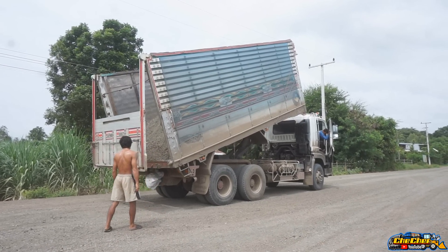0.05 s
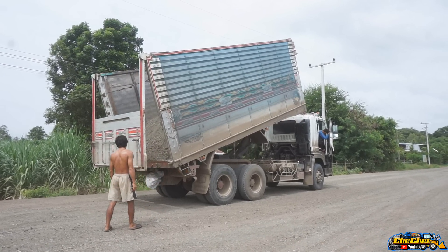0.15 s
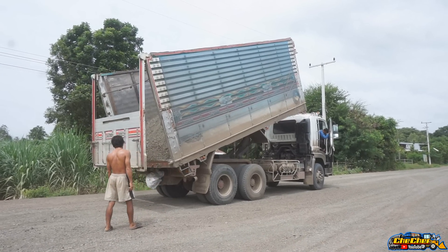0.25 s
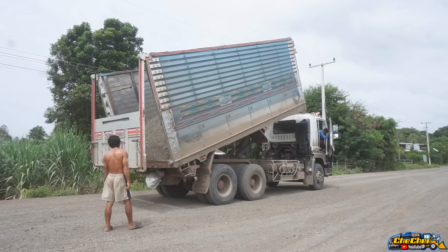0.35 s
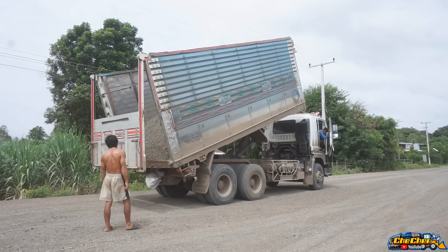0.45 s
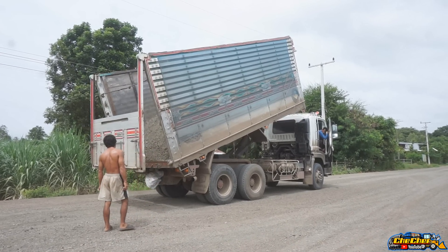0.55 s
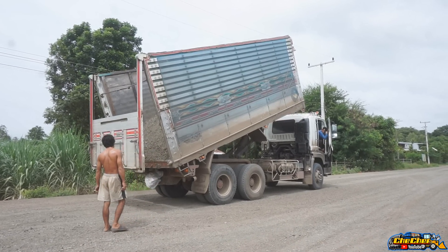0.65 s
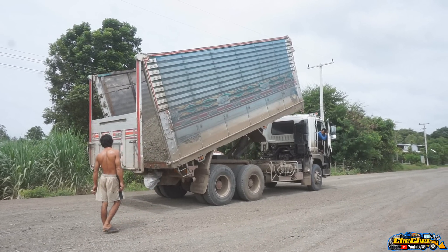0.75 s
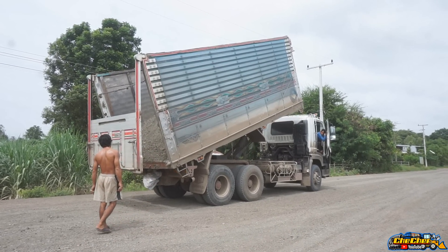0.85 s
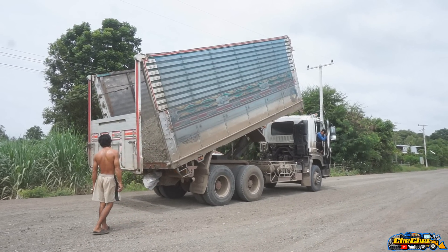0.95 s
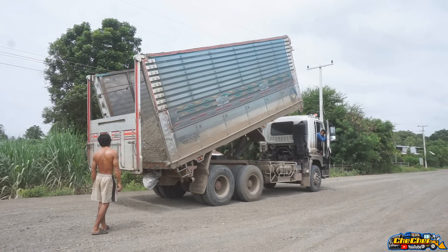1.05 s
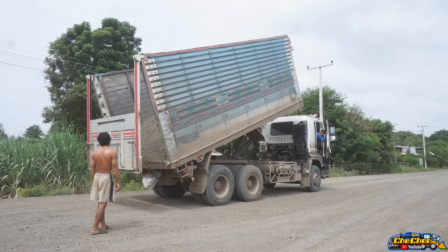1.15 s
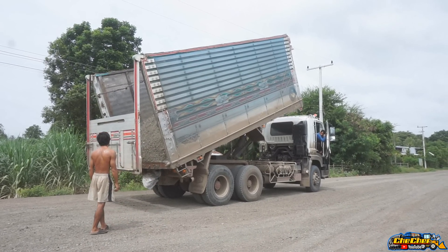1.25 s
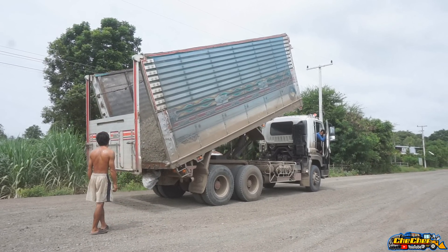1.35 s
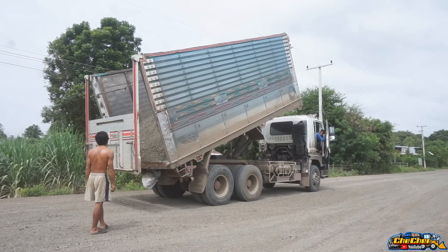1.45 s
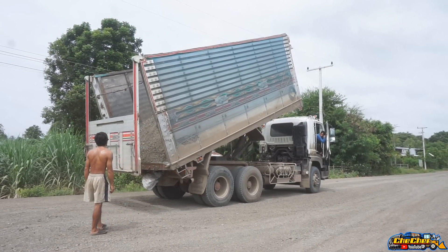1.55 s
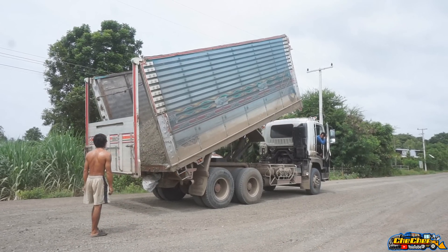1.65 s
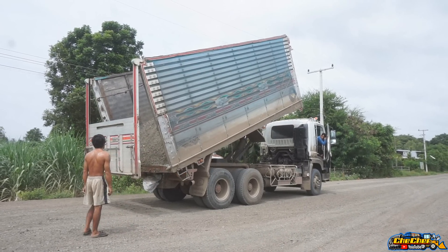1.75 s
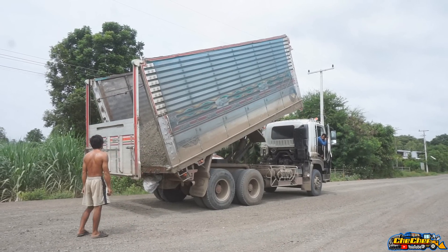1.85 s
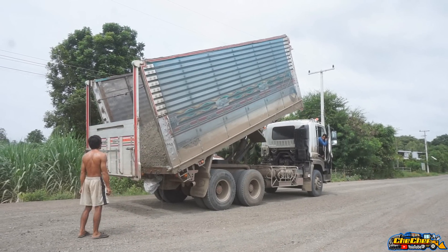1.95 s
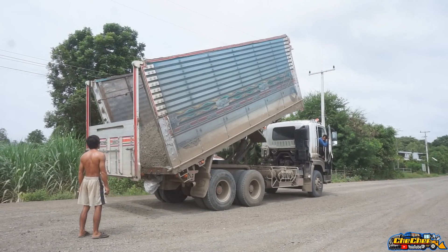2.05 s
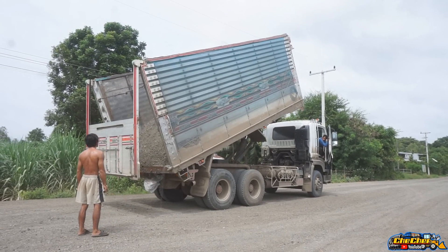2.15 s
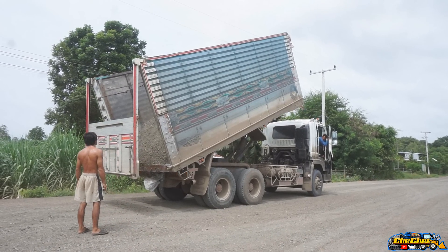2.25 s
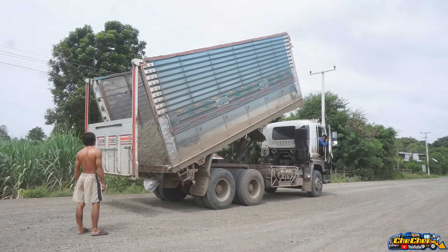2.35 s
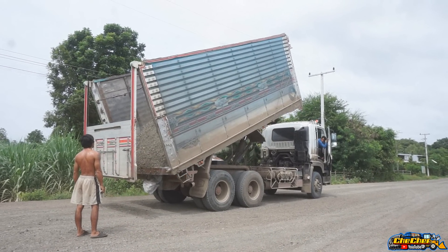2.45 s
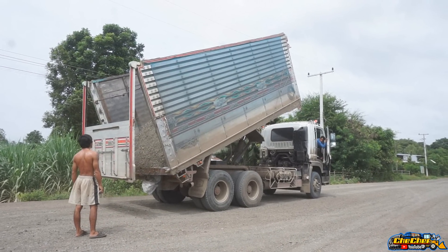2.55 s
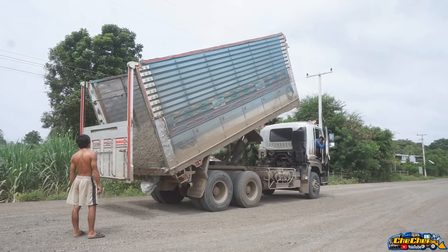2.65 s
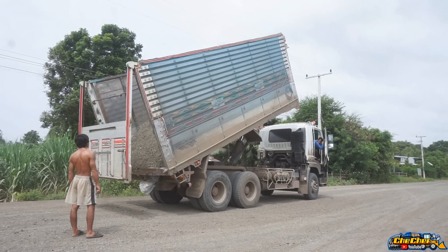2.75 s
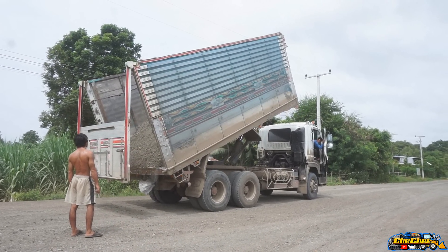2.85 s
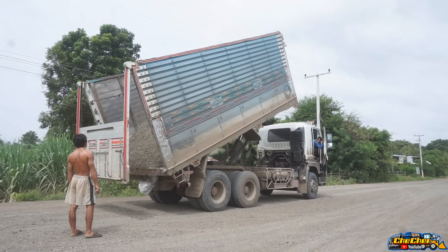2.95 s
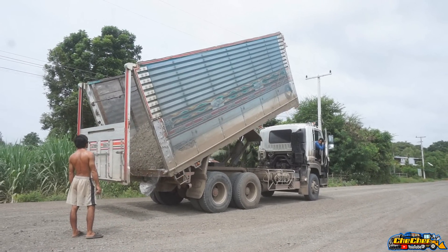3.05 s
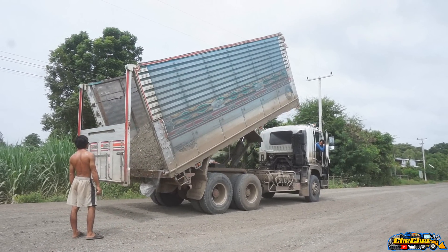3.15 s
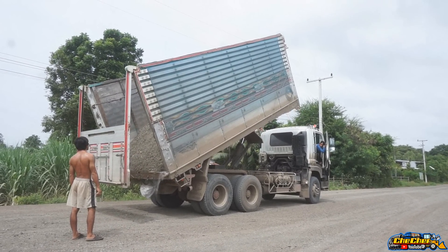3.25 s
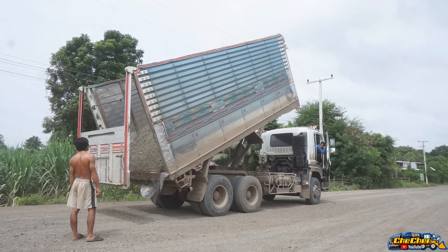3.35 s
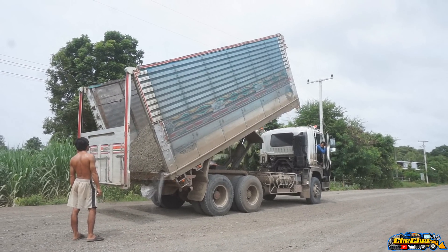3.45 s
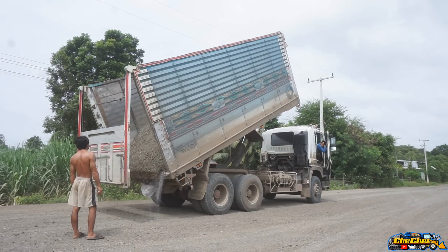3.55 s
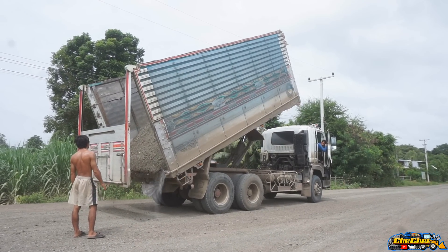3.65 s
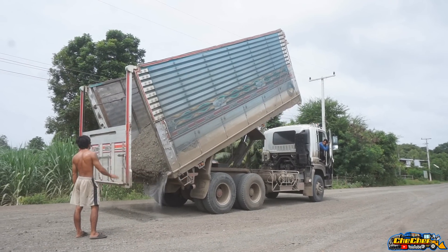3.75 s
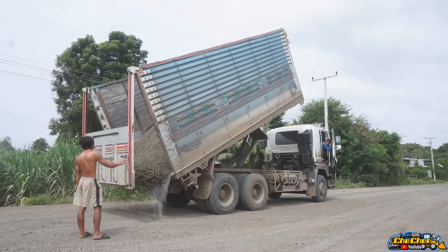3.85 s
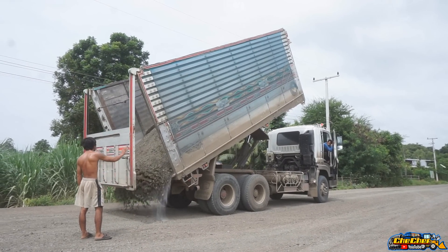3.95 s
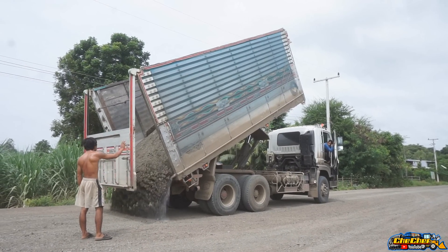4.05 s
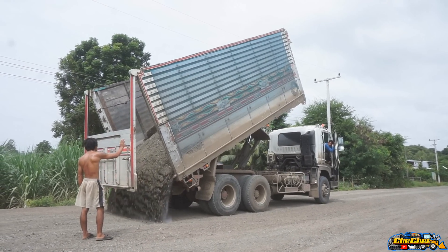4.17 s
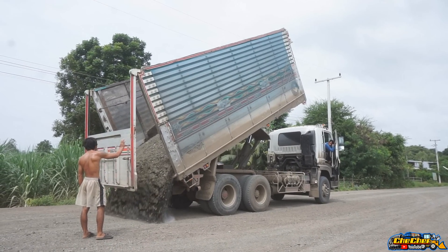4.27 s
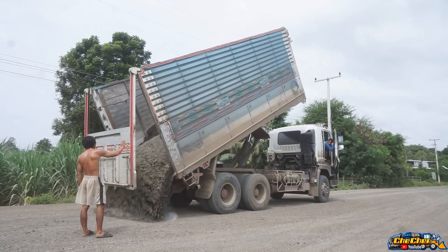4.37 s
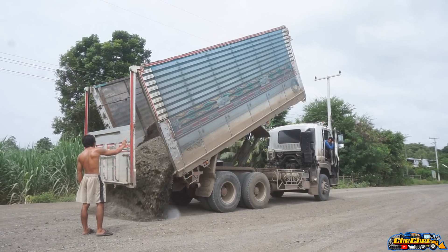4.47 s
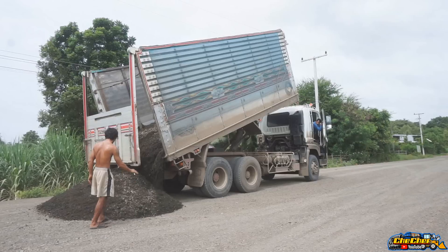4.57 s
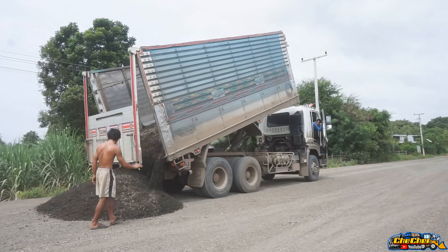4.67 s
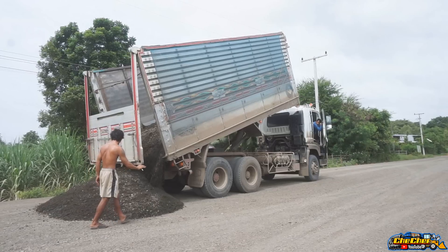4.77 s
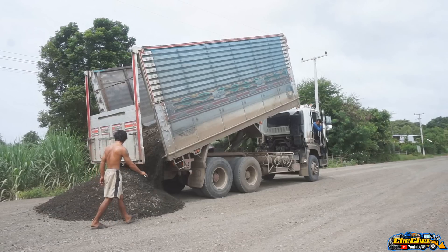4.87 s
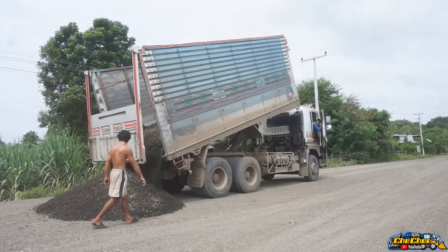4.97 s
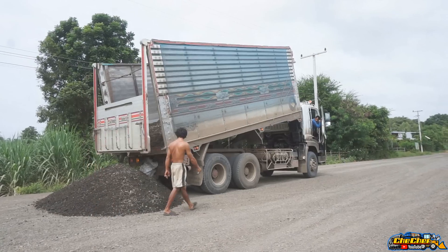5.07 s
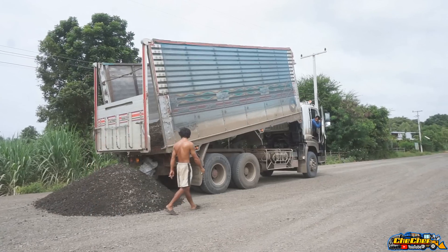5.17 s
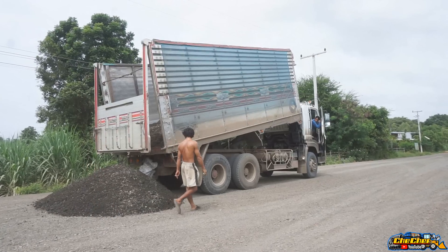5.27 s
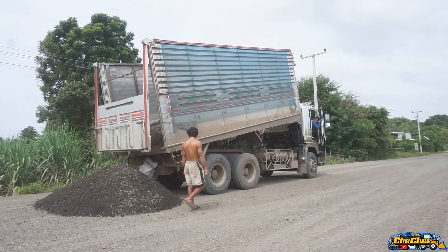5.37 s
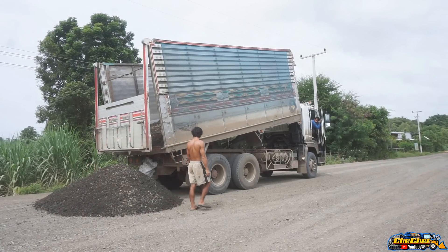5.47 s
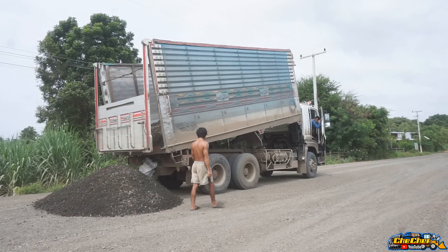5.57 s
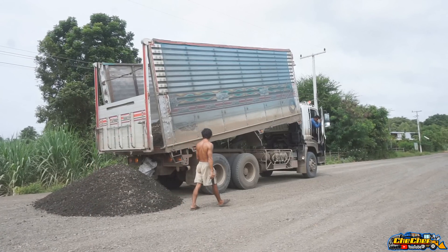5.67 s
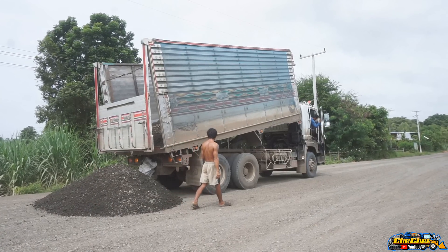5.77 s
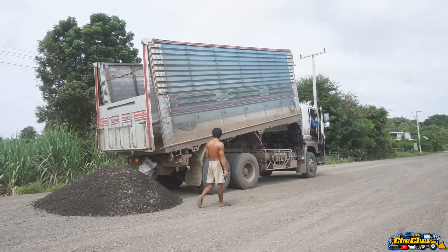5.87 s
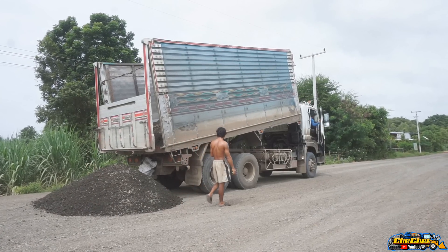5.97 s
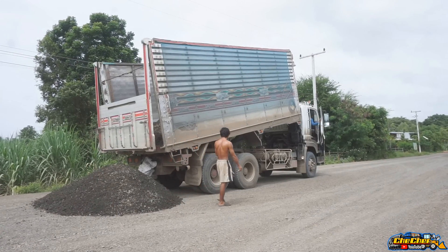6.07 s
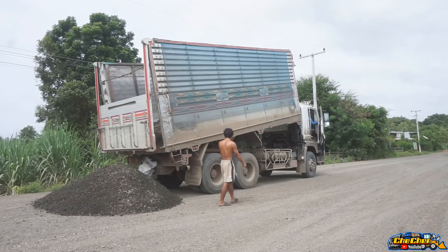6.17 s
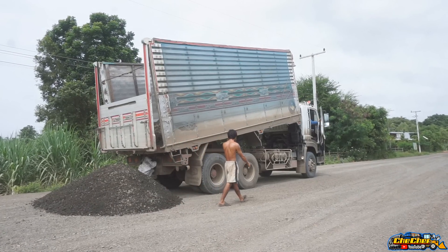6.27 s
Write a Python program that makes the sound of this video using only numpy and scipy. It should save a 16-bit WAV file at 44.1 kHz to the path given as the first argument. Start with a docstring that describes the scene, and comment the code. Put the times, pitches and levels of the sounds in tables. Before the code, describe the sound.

Heard from a phone microphone a few metres off on a gravel road, a tipper truck's diesel engine knocks and rattles under a hydraulic whine, with small stones pattering down. Then the load rushes out over ringing steel, loud and hissing, slightly to the left. The whine cuts off mid-pour and the engine slows. After two quick dropouts, a quieter idle continues with a few stone clicks.

```python
"""A diesel tipper truck clatters and ticks a few metres away while its hydraulic pump whines.
Each firing of its six cylinders knocks the engine block and panels. Loose stones drop from the tail
gate, then at about 3.5 s the load roars out over the steel bed. The pump stops and the engine drops
to a low idle. After that the whole sound twice fades out fast and comes back more slowly."""
import sys
import numpy as np
from scipy import signal
from scipy.fft import rfft, irfft
from scipy.io import wavfile
from scipy.ndimage import uniform_filter1d

SR = 44100
rng = np.random.default_rng(int(sys.argv[2]) if len(sys.argv) > 2 else 0)


def to_wav(sig):
    """Store sig (one row per channel, or 1-D mono) as 16-bit WAV at the path in sys.argv[1].

    Samples outside -1..1 are clipped; the rate is SR.
    """
    pcm = np.clip(np.atleast_2d(sig), -1, 1) * 32767
    pcm = np.round(pcm).astype(np.int16)
    wavfile.write(sys.argv[1], SR, pcm.T)  # frames by channels


N = 278712
T = np.arange(N) / SR
PUMP_OFF_S = 4.27
PUMPING = T < PUMP_OFF_S

# How strong the engine's parts are: (time [s], rumble [dB], clatter [dB], ringing [dB], exhaust [dB])
ENGINE_LEVELS = [(0, -30, -23, -1.5, 2), (1.1, -28, -23.5, 0, 0), (1.6, -29.5, -24.5, 0, -1.5),
                 (2.1, -31, -24, 0.5, -1), (2.8, -30.5, -24, 0, -0.5), (3.53, -29, -24, -1, -3),
                 (3.57, -31, -28.5, -1, -1.5), (4.24, -28, -37, 6.5, -1), (4.32, -36, -46, -3, -9),
                 (4.6, -33.5, -31, -4, -5), (4.8, -43, -31.5, -2, -12), (5.05, -36, -27, 0, -2),
                 (5.3, -41, -29, -4.5, -5), (5.46, -35.5, -32, 0, -5), (5.8, -37.5, -32.5, 2, -3),
                 (6.3, -42, -32, 3.5, 0)]
# Dull thuds through the frame: (time [s], level [dB], pitch [Hz], left minus right [dB], decay [ms])
THUDS = [(1.048, -10.5, 214, -9, 14), (5.106, -13, 330, -1, 4), (5.5, -34, 301, -1, 39)]
def truck(firings):
    """The whole truck. Also returns the engine's knocking, which shakes the loose grit."""
    rumble_db, clatter_db, ring_db, exhaust_db = curve(ENGINE_LEVELS)
    tones = exhaust(firings, exhaust_db) + pump(firings) + drone()
    knock = cylinder_knock(firings)
    body = rumble(knock, rumble_db) + clatter(knock, clatter_db, ring_db) + loose_panel(knock)
    body += bursts(THUDS, width_hz=230, rise_ms=2.7, ringing=0.67)
    body[0] += tones  # the first stream reaches both ears
    return stereo(body) + ticks(firings), knock


# Engine speed while it drives the pump: (time [s], firings [per s])
FIRING_RATE = [(0, 33.1), (1.0, 33.1), (1.06, 33.4), (1.7, 34.03), (4.27, 34.08)]
def count_firings():
    """A running count that goes up by one each time a cylinder fires."""
    idle_hz = 22.415
    first_s, idle_first_s = 0.0212, 5.7278  # cylinder one fires here, pumping and idling
    count = np.cumsum(curve(FIRING_RATE)[0]) / SR
    # adding whole rounds of six keeps the count above zero
    working = count - count[int(first_s * SR)] + 6
    idling = idle_hz * (T - idle_first_s) + 240
    return np.where(PUMPING, working, idling) + 0.018 * wander(5)  # the crank runs a bit early or late


# Each of the six cylinders knocks a little differently: (strength [dB])
CYLINDER_DB = [-0.21, -1.5, 0.58, 0.65, 0.6, 0.28]
def cylinder_knock(firings):
    """A loudness shape: each firing hits with its own strength, then dies away."""
    strength = undb(np.resize(CYLINDER_DB, N // 500) + 2.03 * rng.standard_normal(N // 500))
    return 1.17 + strength[firings.astype(int)] * np.exp(-(firings % 1) / 0.74)


# Tone colour of the clatter, pumping and idling: (frequency [Hz], relative level [dB])
CLATTER_COLOUR = [(250, -24), (400, -15.5), (600, -7.5), (850, -6), (1000, -8.5), (1500, -14.5),
                  (2100, -11.5), (2900, -10), (3500, -15), (4300, -15.5), (5200, -20), (9000, -34)]
IDLE_CLATTER_COLOUR = [(250, -25), (400, -8), (600, -10), (850, -5.5), (1050, -12), (1600, -19.5),
                       (2100, -9), (2900, -11), (3500, -16), (4300, -16.5), (5200, -20.5), (9000, -35)]
# Notes the block and panels ring at: (pitch [Hz], width [Hz], level pumping [dB], level idling [dB])
BLOCK_NOTES = [(737, 24, -15.5, -20), (1140, 64, -33, -10), (1242, 72, -6.5, -12), (1317, 103, -14, -3.5),
               (1510, 70, -22.5, -9), (1643, 40, -11.5, -14.5), (1770, 54, -8.5, -18), (1883, 45, -13, -11),
               (2363, 180, -6.5, -8), (3050, 450, -15, -11), (3740, 410, -15.5, -14)]
def clatter(knock, level_db, ring_db):
    """Firings rattle the engine block and panels; each ringing note swells and fades on its own."""
    hits = grit(spread_db=1.8, share=0.099) * knock
    metal = np.where(PUMPING, colour(hits, CLATTER_COLOUR), colour(hits, IDLE_CLATTER_COLOUR))
    for hz, width, pumping_db, idle_db in BLOCK_NOTES:
        note_db = np.where(PUMPING, pumping_db, idle_db) + ring_db
        metal += ring(noise() * knock, hz, width) * undb(note_db + 0.58 * wander(11))
    return thin_steel(metal, decay_s=0.026) * undb(level_db)


# Tone colour of the rumble, pumping and idling: (frequency [Hz], relative level [dB])
RUMBLE_COLOUR = [(15, -60), (30, -35), (60, -21), (100, -13), (150, 0), (200, -2.5), (250, -0.5),
                 (480, -9.5), (700, -10.5), (1000, -41)]
IDLE_RUMBLE_COLOUR = [(15, -62), (30, -40), (60, -24), (110, -9), (150, -2), (250, -1), (480, -8.5),
                      (700, -12.5), (1000, -42)]
def rumble(knock, level_db):
    """A low rush of gas that pulses with the firings."""
    gas = noise() * (3.1 + knock)
    low = np.where(PUMPING, colour(gas, RUMBLE_COLOUR), colour(gas, IDLE_RUMBLE_COLOUR))
    return low * undb(level_db - 2.5 + 0.3 * wander(10))


# Exhaust tones: (multiple of the firing rate, level pumping [dB], level idling [dB])
EXHAUST_TONES = [(2, -50.5, -76), (3, -42.5, -66), (4, -75, -54.5), (5, -72, -48.5), (6, -37, -55),
                 (7, -47, -62), (8, -56, -54), (9, -68, -54), (10, -65, -46.5), (12, -85, -60),
                 (15, -79, -52)]
def exhaust(firings, swell_db):
    """Regular puffs of exhaust make a hum that follows the engine's speed."""
    return sum(tone(k * firings, np.where(PUMPING, pumping_db, idle_db) + swell_db, waver_db=1.4)
               for k, pumping_db, idle_db in EXHAUST_TONES)


# Pump tones: (multiple of the piston rate, relative level [dB])
PUMP_TONES = [(1, -11), (2, 0.5), (3, 0.5)]
# How loud the whine is: (time [s], level [dB], extra for the second tone [dB])
PUMP_LEVEL = [(0, -41, 4.5), (.98, -42, 6), (1.07, -35, 2.5), (1.7, -36, -2.5), (2.2, -37, -11),
              (2.8, -37, -0.5), (3.7, -39.5, 1), (4.18, -35, 1), (4.26, -43.5, 9)]
def pump(firings):
    """The engine drives the pump's pistons, which whine until the pump is switched off."""
    strokes = 4.517 * firings
    level_db, second_db = curve(PUMP_LEVEL)
    return PUMPING * sum(tone(k * strokes, level_db + db + (k == 2) * second_db, waver_db=1.1)
                         for k, db in PUMP_TONES)


def drone():
    """A steady hum that throbs against the pump's lowest tone and is quieter at idle."""
    return tone(156.1 * T, np.where(PUMPING, -40.5, -58), waver_db=0.53)


# Notes of the loosest panel: (pitch [Hz], width [Hz], relative level [dB])
PANEL_NOTES = [(1071, 55, -6), (1113, 47, 1)]
# How hard it rings: (time [s], level [dB])
PANEL_LEVEL = [(0.0, -31), (0.04, -34), (0.07, -27), (0.12, -37), (0.3, -30), (1.15, -35), (1.19, -26.5),
               (1.32, -35), (2.03, -35), (2.1, -41), (2.3, -30), (2.4, -35.5), (2.82, -41), (2.84, -24),
               (2.87, -35.5), (3.6, -39)]
def loose_panel(knock):
    """The engine shakes one loose panel while the pump runs."""
    ringing = sum(ring(noise() * knock, hz, width) * undb(db) for hz, width, db in PANEL_NOTES)
    return PUMPING * ringing * undb(curve(PANEL_LEVEL)[0] + 2 * wander(10))


# The tick of each cylinder, strongest from the first: (level [dB])
TICK_DB = [-14, -20.5, -32, -23, -22.5, -21.5]
def ticks(firings):
    """One dry, bright tick as each firing begins."""
    count = firings.astype(int)
    starts = np.flatnonzero(np.diff(count) == 1)
    db = np.array(TICK_DB)[count[starts + 1] % 6] + np.where(PUMPING[starts], 0, -1.5)
    pan_db, decay_ms = -0.5, 4.5
    rows = [(s, rng.normal(level, 1), rng.normal(12350, 700), pan_db, decay_ms)
            for s, level in zip(starts / SR, db)]
    return bursts(rows, width_hz=5000, rise_ms=2.2)


# The load sliding out: (time [s], level [dB], deep roar compared with the drumming [dB])
POUR_LEVELS = [(3.53, -38, -3), (3.6, -28, -7), (3.72, -22.5, -6.5), (3.89, -17.5, -8), (4.05, -17.5, -7.5),
               (4.25, -15.5, -8.5), (4.29, -18, -9.5), (4.6, -19, -9), (4.75, -31.5, -7.5), (5.1, -40, -9),
               (5.15, -52, -7)]
# Tone colour of the drumming and of the roar: (frequency [Hz], relative level [dB])
DRUM_COLOUR = [(500, -37), (900, -11), (1550, -12.5), (2200, -12.5), (3500, -8.5), (5000, -13),
               (8000, -20.5)]
ROAR_COLOUR = [(100, -32), (250, -1.5), (500, -6.5), (760, 6.5), (950, 0), (1500, -27.5)]
# Notes the steel bed rings at: (pitch [Hz], width [Hz], relative level [dB])
BED_NOTES = [(1190, 65, -13), (1251, 140, -3), (1937, 200, -5), (2560, 300, -5), (3170, 96, -15.5)]
def pouring_load():
    """Thousands of stones a second drum on the ringing steel bed, over a deep roar."""
    flow_db, roar_db = curve(POUR_LEVELS)
    drumming = colour(grit(spread_db=3.3, share=0.067) * undb(wander(25)), DRUM_COLOUR)
    drumming += sum(ring(noise(), hz, width) * undb(db + 0.47 * wander(11))
                    for hz, width, db in BED_NOTES)
    roar = colour(noise(), ROAR_COLOUR) * undb(roar_db + 0.61 * wander(12))
    load = thin_steel(drumming, decay_s=0.011) + roar
    return stereo(load * undb(flow_db)) * lean_left(1.6)


# The trickle of stones: (time [s], level [dB], left minus right [dB], finest dust [dB])
TRICKLE_LEVELS = [(0, -36, -3, 2), (.6, -38, -.5, 1), (1.4, -37, -.5, 2), (2.4, -35.5, 1.5, 1.5),
                  (3.34, -36, 1, 0.5), (3.7, -34, 4.5, -1), (3.88, -31, 8.5, -6), (4.05, -26, 6, -11),
                  (4.28, -23, 6.5, -2), (4.46, -20, 6.5, -2.5), (4.62, -21.5, 6.5, -1.5), (4.75, -34, 5, 3),
                  (4.94, -30, 3.5, 2), (5.1, -31, 5.5, 3.5), (5.3, -38, 0, 2.5), (5.45, -35, 2, -3),
                  (5.65, -40.5, 1.5, -1), (6.3, -40.5, -1.5, -3)]
# Tone colour of the grit and of the dust: (frequency [Hz], relative level [dB])
GRIT_COLOUR = [(3000, -27), (4500, -5), (6000, -4.5), (8000, -3), (10000, -2), (12000, -3.5), (14000, -20)]
DUST_COLOUR = [(7000, -27), (10000, -4.5), (12000, -0.5), (14000, 1), (15500, -2), (17000, -7.5)]
def trickle(knock):
    """Grit and dust hiss as the engine shakes them, and small stones patter at random."""
    level_db, pan_db, dust_db = curve(TRICKLE_LEVELS)
    shake = (0.27 + knock) * undb(1.4 * wander(15))
    hiss = colour(grit(spread_db=2.5, share=0.049) * shake, GRIT_COLOUR)
    dust = colour(grit(spread_db=2.5, share=0.033) * shake, DUST_COLOUR)
    hiss += dust * undb(dust_db - 1.5) * lean_left(4.5)
    rows = [(when * T[-1], -3 + 13 * force ** 3, 5000 + 9000 * pitch, 0, 5.5 + 6.6 * length)
            for when, force, pitch, length in rng.random((500, 4))]
    patter = bursts(rows, width_hz=5000, rise_ms=0.85)
    return stereo(hiss + patter) * undb(level_db) * lean_left(pan_db)


# Sharp clicks that stand out: (time [s], level [dB], pitch [Hz], left minus right [dB])
SHARP_CLICKS = [(0.2603, -20, 12000, 6), (0.4085, -16, 13100, 4.5), (0.8983, -25, 12600, 2.5),
                (1.0015, -15, 10800, 3), (1.042, -20, 9420, 3), (1.221, -16.5, 9860, 0),
                (1.3289, -19, 13300, 2), (1.489, -17, 14900, 6), (1.5162, -19.5, 10700, 8),
                (1.705, -14, 13600, 6), (1.7549, -18, 12900, 6.5), (1.8157, -19, 13500, 4.5),
                (1.9445, -18, 14100, 4), (2.3246, -16, 13200, -1), (2.612, -12.5, 12400, 7),
                (3.0228, -22, 8750, -3), (3.3067, -19, 11800, 7), (3.5396, -12, 14300, 7.5),
                (3.674, -15, 12100, 5), (3.742, -15, 12000, 13), (3.8429, -15, 9000, 6.5),
                (4.7055, -16, 12800, 12), (4.9696, -13, 9060, 10), (5.434, -14, 8270, 6.5)]
# Larger stones on steel: (time [s], level [dB], pitch [Hz], left minus right [dB], decay [ms])
STONE_KNOCKS = [(1.605, -15, 2370, 1.5, 7), (1.66, -22, 2320, -3, 8.4), (1.748, -17, 3830, 5, 5.9),
                (2.613, -20, 3170, 4, 7.7), (4.58, -15, 1180, 1, 7), (5.004, -17, 1306, 8, 5.5),
                (5.982, -30.5, 4600, 14, 13)]
def clicks_and_knocks():
    """The clicks are small stones landing and one louder engine tick; larger stones knock on steel."""
    click_ms = 5.7
    clicks = bursts([(*row, click_ms) for row in SHARP_CLICKS], width_hz=7000, rise_ms=1.3)
    return clicks + bursts(STONE_KNOCKS, width_hz=1600, rise_ms=1, ringing=0.56)


def bursts(rows, width_hz, rise_ms, ringing=0):
    """One small impact per row: a short noise around its pitch, plus a clean note if ringing is set."""
    s, db, hz, pan_db, decay_ms = np.transpose(rows)[:, :, None]
    t = np.arange(3000) / SR
    span = int(SR / width_hz)
    texture = ringing + smooth(rng.standard_normal((len(s), 2, len(t))), span) * np.sqrt(span)
    rise = 1 - np.exp(-1000 * t / rise_ms)
    decay = np.exp(-1000 * t / decay_ms)
    ping = undb(db) * np.cos(2 * np.pi * hz * t) * rise * decay
    out = np.zeros((2, N + len(t)))
    samples = (s * SR).astype(int) + np.arange(len(t))
    for side, sign in enumerate((1, -1)):
        np.add.at(out[side], samples, texture[:, side] * ping * undb(sign * pan_db / 2))
    return out[:, :N]


def ring(x, hz, width_hz):
    """Metal ringing at one note: keeps only a narrow band of x."""
    b, a = signal.iirpeak(hz, hz / width_hz / 1.7, SR)
    return unit(signal.lfilter(b, a, signal.lfilter(b, a, x)))


def thin_steel(x, decay_s):
    """Thin steel adds a short ring of many notes close together."""
    t = np.arange(4000) / SR
    tail = rng.standard_normal(len(t)) * np.exp(-t / decay_s)
    return unit(x + 0.18 * unit(signal.fftconvolve(x, tail[None])[:, :N]))


def tone(cycles, db, waver_db):
    """A pure tone whose level wavers slowly."""
    return np.sqrt(2) * undb(db + waver_db * wander(5.4)) * np.sin(2 * np.pi * (cycles + rng.random()))


def noise():
    """Two unrelated streams of hiss."""
    return rng.standard_normal((2, N))


def grit(spread_db, share):
    """Hiss in which a share of the samples are harder impacts."""
    hiss = noise()
    is_hit = rng.random((2, N)) < share
    hardness = np.minimum(rng.exponential(1, (2, N)), 3.5)
    return hiss * undb(spread_db * is_hit * hardness)


def colour(x, points):
    """Gives x the tone colour in a table, at a standard level."""
    cepstrum = irfft(np.log(undb(over_hz(points, np.arange(2049) * SR / 4096))))
    # folding onto the first half makes the filter ring after a hit, never before it
    cepstrum[1:2048] *= 2
    cepstrum[2049:] = 0
    response = irfft(np.exp(rfft(cepstrum)))
    return unit(signal.fftconvolve(x, response[None])[:, :N])


def wander(rate):
    """A smooth random drift that picks a new value rate times a second."""
    span = int(SR / rate)
    steps = np.repeat(rng.standard_normal(N // span + 1), span)
    return 0.95 * smooth(steps, span)[:N]


def smooth(x, span):
    """Averages twice over span samples."""
    return uniform_filter1d(uniform_filter1d(x, span), span)


def curve(table):
    """Joins a table's timed points with straight lines, one curve per value column."""
    times, *columns = np.transpose(table)
    return [np.interp(T, times, column) for column in columns]


def over_hz(points, hz):
    """Reads a frequency table, with octaves evenly spaced."""
    frequencies, values = np.transpose(points)
    return np.interp(np.log(hz + 1), np.log(frequencies + 1), values)


def undb(db):
    """Turns decibels into a gain."""
    return 10 ** (np.asarray(db) / 20)


def unit(x):
    """Scales x to a standard level (rms 1)."""
    return x / np.sqrt(np.mean(x ** 2))


def lean_left(db):
    """Two gains that make the left louder than the right by db."""
    return undb(db * np.array([[0.5], [-0.5]]))


# How far the left wave runs ahead: (frequency [Hz], phase lead [radians])
LEFT_LEAD = [(30, 1.5), (150, -0.33), (300, -0.58), (600, -1), (2000, -0.86), (3200, -0.56), (5300, -1.1),
             (10500, -1.64), (15500, -1.9)]
# How alike the two sides are: (frequency [Hz], likeness [0-1])
LIKENESS = [(30, 0.96), (200, 0.94), (1500, 0.94), (3000, 0.75), (5000, 0.35), (8000, 0.35), (15000, 0.4)]
# Which side is louder: (frequency [Hz], left minus right [dB])
BALANCE = [(60, -1), (300, 0.2), (700, 0.5), (1300, 2.5), (2400, -0.6), (4400, 3), (8000, 2), (15000, 1)]
def stereo(pair):
    """A phone's two microphones: the left hears the first stream, the right a blend of both."""
    hz = np.arange(N // 2 + 1) * SR / N
    first, second = rfft(pair)
    alike = over_hz(LIKENESS, hz)
    blend = alike * first + np.sqrt(1 - alike ** 2) * second
    tilt = undb(over_hz(BALANCE, hz) / 2) * np.exp(0.5j * over_hz(LEFT_LEAD, hz))
    return irfft([first * tilt, blend / tilt], N)


def scene():
    """The truck, its sliding load and the loose stones together."""
    engine, knock = truck(count_firings())
    return engine + pouring_load() + trickle(knock) + clicks_and_knocks()


# Brief dips in level: (quietest moment [s], fade-out [s], fade-in [s])
DIPS = [(4.648, 0.029, 0.13), (5.123, 0.021, 0.15)]
def record(dry):
    """Dips twice almost to silence, gently rounds the peaks and cuts the highest treble."""
    gain = 1
    for s, out_s, in_s in DIPS:
        ramp = np.where(T < s, (s - T) / out_s, (T - s) / in_s)
        gain = gain * np.clip(ramp + 0.0068, 0, 1)
    rounded = np.tanh(0.84 * gain * dry) / 0.76
    treble_cut = signal.ellip(10, 0.2, 70, 15780, fs=SR, output="sos")
    return signal.sosfilt(treble_cut, rounded)


dry = scene()
out = record(dry)
to_wav(out)
```